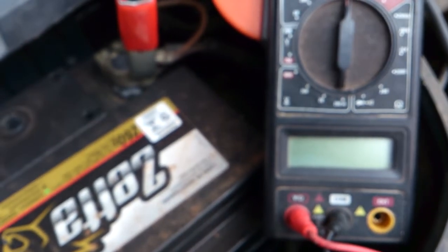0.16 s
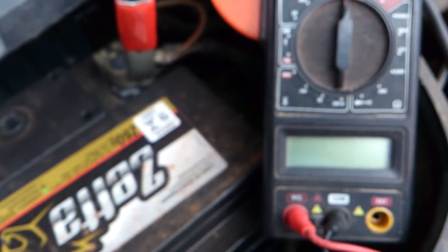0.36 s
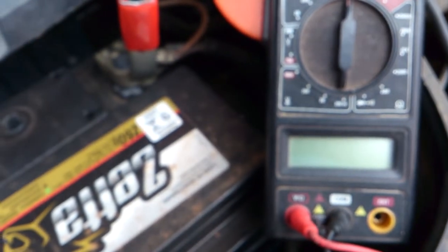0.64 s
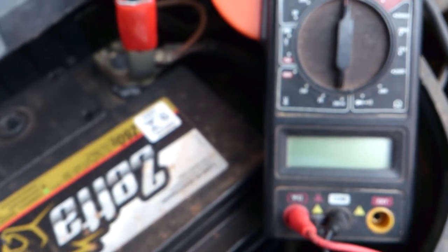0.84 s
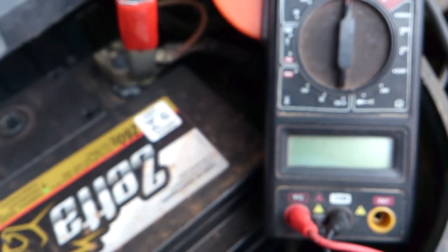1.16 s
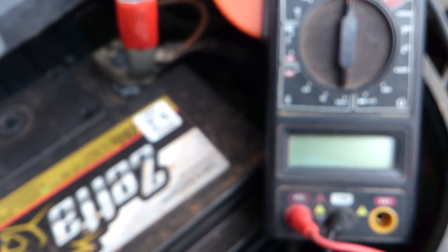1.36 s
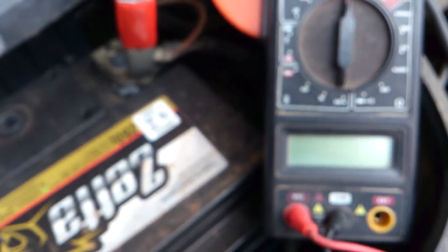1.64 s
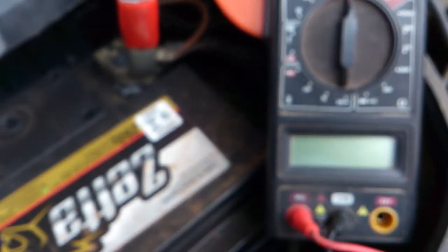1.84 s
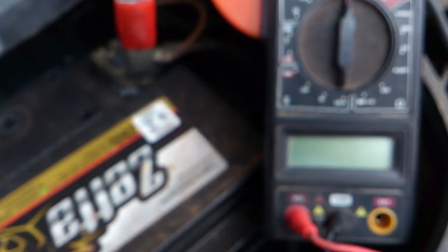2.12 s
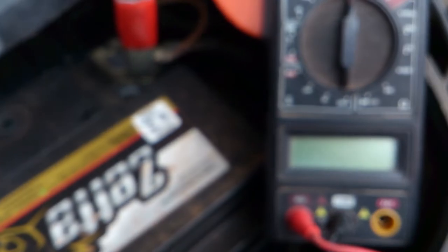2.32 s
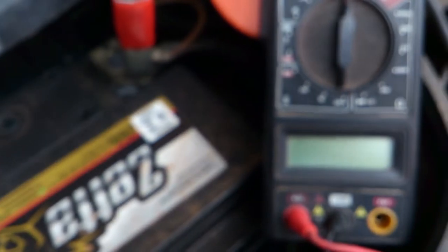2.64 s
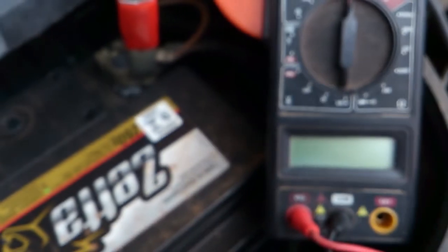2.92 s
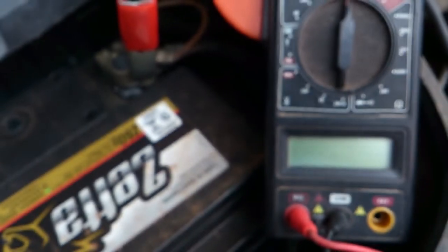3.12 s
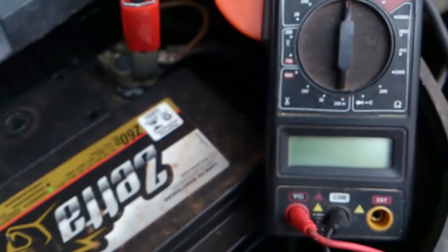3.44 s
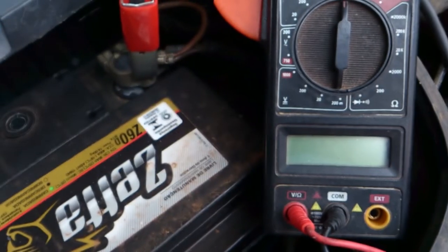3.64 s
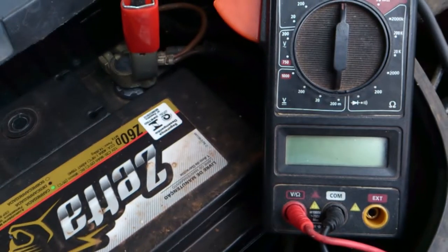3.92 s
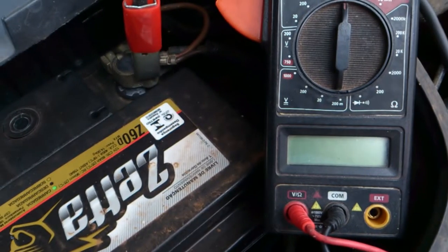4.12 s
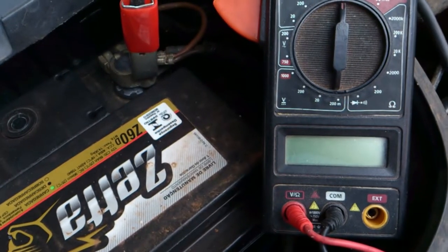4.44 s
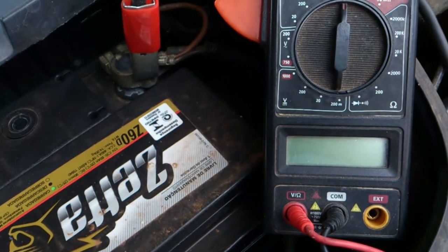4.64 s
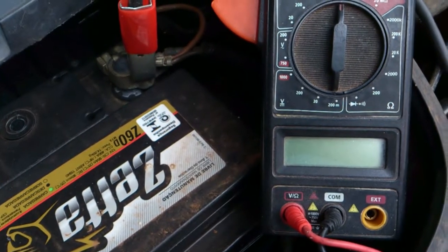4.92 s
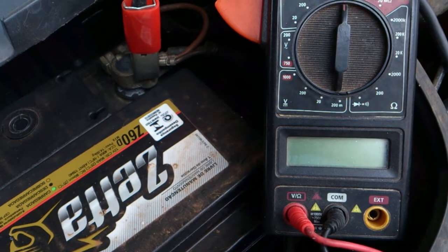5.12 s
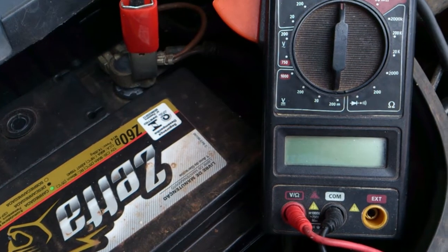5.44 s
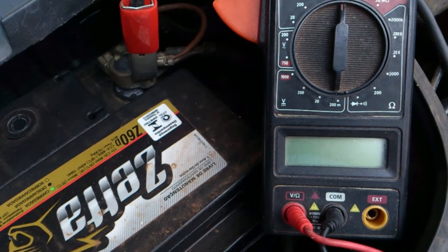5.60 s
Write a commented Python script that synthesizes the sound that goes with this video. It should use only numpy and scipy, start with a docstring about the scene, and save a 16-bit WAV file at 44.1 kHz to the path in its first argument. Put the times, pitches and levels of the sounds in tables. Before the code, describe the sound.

From 0 s a four-cylinder engine idles roughly, heard close under its open bonnet in mono. A hard, bright tappet tick repeats about eight times a second over clattering valves and pistons, airy chuffs and a low exhaust boom with one weak beat. At 0.36 s a sharp spark snaps; around 0.45 s the drone drops out briefly, then steady idling resumes. At 3.1 s it is switched off: ticks slow and soften, the block shudders, and from 3.26 s a dragging belt rasps in surges with hoarse squeals near 1.1 kHz. The crank stops at 3.9 s; dull mount knocks follow around 4.2-4.3 s, with small scrapes and faint ticks. A low distant hum emerges at about 4 s, and a thin squeak at 4.4 s. At 4.7 s a door shuts with a crash and deep thud. Short falling squeaks trail until 5.2 s; quiet hum and air remain.

```python
"""A four-cylinder engine idles under an open bonnet: its exhaust booms with one weak cylinder, its valves and
pistons clatter, and a loud tappet ticks once in each cycle. Early on a stray spark snaps and the engine
misses for a beat. It is switched off and runs down with a rasping, squealing belt, then rocks back and knocks
on its mounts. A distant machine starts to hum and a thin squeak is heard; then a door shuts with a crash and
a thud, more squeaks follow, and the hum remains. Filtered noise, ringing modes and sine waves make it all."""
import sys
import numpy as np
from scipy import signal
from scipy.fft import rfft, irfft
from scipy.io import wavfile
from scipy.ndimage import uniform_filter1d

SR = 44100
rng = np.random.default_rng(int(sys.argv[2]) if len(sys.argv) > 2 else 0)


def digitize_waveform(pressure):
    """Quantize a signal to 16-bit integers and store it at the path in sys.argv[1].

    Rows of a 2-D input are taken as channels; values are limited to [-1, 1].
    """
    field = np.atleast_2d(pressure).T
    bounded = np.clip(field, -1, 1)
    quanta = np.round(bounded * 32767).astype(np.int16)
    wavfile.write(sys.argv[1], SR, quanta)


N = 254438
TIME = np.arange(N) / SR

# puffs of the four cylinders: (share of the cycle after the tick, relative level [dB])
FIRING_PUFFS = [(0.087, 2), (0.338, 3.5), (0.592, 0), (0.842, -10)]
# resonances of the engine block: (frequency [Hz], width [Hz], height above the noise [dB])
BLOCK_PEAKS = [(425, 6.9, 2.5), (541, 11, 5.5), (985, 80, 8), (1054.5, 13.2, 7.5), (1469, 22, 12),
               (1668, 22, 8.5), (1813, 50, 5.5), (2160, 28, 9), (2356, 55, 3), (2600, 40, 6)]
# resonances of the cylinder head: (frequency [Hz], width [Hz], height above the noise [dB])
HEAD_PEAKS = [(4300, 77, 3.3), (5310, 155, 12.2), (6130, 290, 4.7), (6800, 130, 8.8), (9200, 94, 1.3),
              (10980, 200, 2.1), (11770, 200, 3.3)]

IDLE_RPM, FIRST_TICK_S, STOP_S = 990, 0.0859, 3.89
# the ignition fails for a moment, and later it is switched off
MISS_S, MISS_LENGTH_S, SWITCH_OFF_S = 0.44, 0.086, 3.125
# gain of the running engine at idle speed, and its change down to standstill
RUMBLE_DB, RUMBLE_SLOW_DB = -37.5, -12


def from_db(db):
    """Turn decibels into a gain."""
    return 10 ** (np.asarray(db) / 20)


def rms_one(x):
    """Scale a signal to unit power."""
    return x / np.sqrt(np.mean(x ** 2) + 1e-20)


def white():
    """Fresh white noise."""
    return rng.standard_normal(N)


def coloured(noise, colour, peaks=()):
    """Shape noise with a smooth spectrum and resonances on top, then scale it to unit power."""
    hz = np.arange(N // 2 + 1) * SR / N + 0.0011
    points, levels = np.transpose(colour)
    db = np.interp(np.log(hz), np.log(points), levels)
    for centre, width, height in peaks:
        db = db + height / (1 + (2 * (hz - centre) / width) ** 2)
    return rms_one(irfft(rfft(noise) * from_db(db), N))


def clicks(times, db):
    """Single-sample blows at the given times and levels."""
    at = np.round(np.asarray(times) * SR).astype(int)
    inside = (at >= 0) & (at < N)
    gains = from_db(db) * np.ones(len(at))
    return np.bincount(at[inside], gains[inside], N)


def dying(blows, decay_s):
    """Envelope of blows whose energies add up and die away."""
    energy = signal.lfilter([1], [1, -np.exp(-2 / (decay_s * SR))], blows ** 2 + 1e-18)
    return np.sqrt(energy)


def ring(blows, modes):
    """Each blow sets the modes (frequency, level, time to fall 60 dB) ringing, with alternating signs."""
    out = np.zeros(N)
    for k, (hz, db, t60) in enumerate(modes):
        r, w = np.exp(-np.log(1000) / (t60 * SR)), 2 * np.pi * hz / SR
        feedback = [1, -2 * r * np.cos(w), r * r]
        out += (-1) ** k * from_db(db) * signal.lfilter([0, np.sin(w)], feedback, blows + 1e-18)
    return out


def resonate(x, hz, width):
    """A resonance with gain 1 at its peak."""
    r = np.exp(-np.pi * width / SR)
    forward = np.array([1, 0, -1]) * (1 - r * r) / 2
    feedback = [1, -2 * r * np.cos(2 * np.pi * hz / SR), r * r]
    return signal.lfilter(forward, feedback, x + 1e-18)


def flutter(rate, depth_db):
    """A gain that wanders between random values, drawn at this rate per second."""
    return from_db(depth_db * np.interp(TIME * rate, np.arange(N), white()))


def swell(start, length, attack_s, release_s):
    """Rise, hold and fall; the rise comes before start, where the hold begins."""
    rise = np.maximum(start - TIME, 0) / attack_s
    fall = np.maximum(TIME - start - length, 0) / release_s
    return np.exp(-rise - fall)


def speed():
    """Crank speed as a share of idle: it idles, stumbles at the miss and runs down."""
    # (time [s], crank speed [rpm])
    crank_rpm = [(0.0, 979.3), (0.33, 993.1), (0.39, 924.4), (0.46, 985.2), (1.1, 997.2), (1.9, 996.9),
                 (2.45, 979.9), (2.85, 995.9), (3.131, 985.0), (3.33, 719.5), (3.6, 427.4), (3.89, 0.0)]
    return np.interp(TIME, *np.transpose(crank_rpm)) / IDLE_RPM


def by_speed(idle_db, slow_db):
    """A gain that changes by slow_db as the crank slows to a standstill."""
    return from_db(idle_db + slow_db * (1 - speed()))


def cycles():
    """Engine cycles, of two crank turns each, counted from the first tick."""
    turned = np.cumsum(speed()) * IDLE_RPM / 120 / SR  # one cycle a second is 120 rpm
    return turned - np.interp(FIRST_TICK_S, TIME, turned)


def crank_times(shares):
    """When the crank passes these shares of its cycle, one row per cycle; -1 where it never does."""
    turned, turning = cycles(), TIME < STOP_S
    angles = np.arange(-1, turned[-1])[:, None] + np.asarray(shares)
    return np.interp(angles, turned[turning], TIME[turning], left=-1, right=-1)


def tick_times():
    """The tappet strikes at the start of each cycle."""
    s = crank_times([0]).ravel()
    return s[s > 0]


def every_cycle(shares, db, scatter_db, jitter_s):
    """Blows near fixed crank angles, repeated until the crank stops."""
    times = crank_times(shares)
    times = times + jitter_s * rng.standard_normal(times.shape)
    levels = db + scatter_db * rng.standard_normal(times.shape)
    return clicks(times.ravel(), levels.ravel())


def cycle_noise(alike):
    """The same parts meet in each cycle, so a share of the noise power repeats."""
    starts = np.round(np.r_[0, tick_times()] * SR).astype(int)
    since = np.arange(N) - starts[np.searchsorted(starts, np.arange(N), side="right") - 1]
    return np.sqrt(alike) * white()[since] + np.sqrt(1 - alike) * white()


def stroke_swing(lag_share):
    """Swing of the load, from -1 to 1, with the four compression strokes of each cycle."""
    return np.cos(2 * np.pi * (len(FIRING_PUFFS) * cycles() - lag_share))


def tappet(tick_db=-4.5, tick_slow_db=-13, scatter_db=0.45, crack_db=-9, decay_s=0.0035,
           rebound_db=-6, rebound_s=0.0057, ring_db=-1, bay_db=-20, bay_decay_s=0.011):
    """A hard strike and its rebound crack as noise; the cover rings and the engine bay echoes."""
    # ring of the valve cover: (frequency [Hz], level [dB], time to fall 60 dB [s])
    cover_modes = [(3700, -39, 0.088), (4246, -24.5, 0.11), (4670, -42.5, .05), (5185, -8.5, 0.035),
                   (6540, -19.5, 0.03), (7085, -13.5, 0.042), (8400, -30, .035), (8880, -19, 0.0345),
                   (9450, -15.5, 0.06), (10050, -18.5, 0.039), (10320, -20.5, .035), (12000, -24, 0.034),
                   (13600, -33, .04)]
    # colour of the crack: (frequency [Hz], level per hertz [dB])
    tick_colour = [(1000, -41.5), (2800, -15), (3600, -6), (5500, -2.5), (6200, -14.5), (8200, -5.5),
                   (9300, -1), (10500, -2), (12000, -8), (13000, -11), (14000, -27), (16000, -68.5)]
    s = tick_times()
    slowing = 1 - np.interp(s, TIME, speed())
    db = tick_db + tick_slow_db * slowing + scatter_db * rng.standard_normal(len(s))
    strikes = clicks(s, db)
    rebounds = clicks(s + rebound_s, db + rebound_db)
    echo = from_db(bay_db) * dying(strikes, bay_decay_s)
    envelope = np.hypot(dying(strikes + rebounds, decay_s), echo)
    crack = from_db(crack_db) * envelope * coloured(cycle_noise(alike=0.7), tick_colour, HEAD_PEAKS)
    # the blow reaches each mode at a slightly different moment
    delays_s = rng.uniform(0.000619, 0.001864, len(cover_modes))
    ringing = sum(ring(clicks(s + late, db + ring_db), [mode]) for late, mode in zip(delays_s, cover_modes))
    return crack + ringing


def machinery(click_db=1, slow_click_db=-7, click_decay_s=0.0058, valve_lag_share=0.06,
              hiss_idle_db=-35.5, hiss_slow_db=-14, hiss_db=-4, hiss_release_s=0.15,
              clatter_db=-1, clatter_decay_s=0.02, rumble_db=1, rumble_release_s=0.071,
              settled_s=4.4, settling_db=-6):
    """Valves click and pistons clatter, as bursts of noise, over the steady rush of the running engine."""
    # two valves close per cylinder: (share of the cycle after the tick, first level [dB], second level [dB])
    valve_closings = [(.014, 8, 6.5), (0.24, -1, 7.5), (.503, 3.5, 6), (0.718, 2.5, 2)]
    # piston slap: (share of the cycle after the tick, relative level [dB])
    piston_slaps = [(.073, 8.5), (.3, 1), (.44, 1.5), (.646, 5.5), (.72, 6.5)]
    # colours of click, clatter and rumble: (frequency [Hz], level per hertz [dB])
    click_colour = [(1500, -7.5), (3500, -6), (6200, -8.5), (7000, -2), (8200, -1), (9300, 5.5),
                    (11000, -0.5), (12800, -7.5), (13600, -3.5), (14400, -22.5), (16000, -47)]
    clatter_colour = [(200, -32.5), (550, -11), (800, -3), (1300, -8), (2200, -5), (3000, -2), (4200, -4.5),
                      (6000, -9.5), (8000, -4.5), (14000, -43)]
    rumble_colour = [(25, -29), (60, 1), (130, -5.5), (220, -3.5), (350, -2.5), (600, 0), (800, -5),
                     (1050, -5.5), (1350, -7), (1800, -6.5), (3000, -16.5), (6000, -12.5), (14000, -44)]
    # some rumble outlasts the crank, until the block rests on its mounts
    settling = from_db(np.interp(TIME, [STOP_S, settled_s], [0, settling_db]))
    settling = settling * swell(0, settled_s, 1, rumble_release_s)
    rumble_gain = by_speed(RUMBLE_DB, RUMBLE_SLOW_DB) * settling
    hiss_gain = by_speed(hiss_idle_db, hiss_slow_db) * swell(0, STOP_S, 1, hiss_release_s)
    share, first_db, second_db = np.transpose(valve_closings)
    closings = every_cycle(np.r_[share, share + valve_lag_share], np.r_[first_db, second_db],
                           scatter_db=1.0, jitter_s=0.001)
    # a slowing cam sets the valves down more gently
    valves = by_speed(click_db, slow_click_db) * rms_one(dying(closings, click_decay_s))
    slaps = every_cycle(*np.transpose(piston_slaps), scatter_db=2.0, jitter_s=0.00082)
    pistons = rms_one(dying(slaps, clatter_decay_s))
    top = coloured(cycle_noise(alike=0.17), click_colour, HEAD_PEAKS)
    top = np.hypot(valves, from_db(hiss_db)) * top
    middle = coloured(cycle_noise(alike=0.31), clatter_colour, BLOCK_PEAKS + HEAD_PEAKS)
    middle = from_db(clatter_db) * pistons * middle
    low = from_db(rumble_db) * coloured(cycle_noise(alike=0.42), rumble_colour, BLOCK_PEAKS)
    return hiss_gain * top + rumble_gain * (middle + low)


def gasp(gasp_db=-2.2, decay_s=0.017):
    """The engine chuffs in the later half of each cycle: bursts of noise, like gasps of air."""
    # gasps of air: (share of the cycle after the tick, relative level [dB])
    gasp_blows = [(0.532, 0.5), (0.721, 5.5), (.78, 4.5), (0.851, -14.5)]
    # (frequency [Hz], level per hertz [dB])
    gasp_colour = [(900, -6.5), (1600, -5), (2200, 4.5), (2600, -3), (3100, -6), (4500, -5), (8000, -24)]
    blows = every_cycle(*np.transpose(gasp_blows), scatter_db=1.2, jitter_s=0.001)
    envelope = rms_one(dying(blows, decay_s))
    air = coloured(cycle_noise(alike=0.25), gasp_colour, BLOCK_PEAKS)
    return by_speed(RUMBLE_DB + gasp_db, RUMBLE_SLOW_DB) * envelope * air


def drone_level(idle_db=-30.5, miss_db=-17, coast_db=-3.5, knee_share=0.6, stall_db=-26, change_s=0.012):
    """The drone drops out at the miss, softens without ignition and collapses once the crank is slow."""
    missing = swell(MISS_S, MISS_LENGTH_S, change_s, change_s)
    coasting = swell(SWITCH_OFF_S, TIME[-1], change_s, change_s)
    stalling = np.maximum(1 - speed() / knee_share, 0)
    return from_db(idle_db + miss_db * missing + coast_db * coasting + stall_db * stalling)


def exhaust(shake_db=-43.5, shake_delay_s=0.055, shake_length_s=0.27, shake_attack_s=0.035,
            shake_release_s=0.26, stumble_db=-5):
    """Four puffs a cycle, one weak, boom in the pipe; the block shudders at the miss and as it slows."""
    # pipe resonances, each passed twice: (frequency [Hz], width of one pass [Hz], level [dB])
    pipe_modes = [(58.7, 13, -25.5), (102.9, 12, -13), (133.9, 17.2, 0.5), (164.5, 9.9, -11),
                  (233.9, 13, -22.5)]
    share, db = np.transpose(FIRING_PUFFS)
    puffs = every_cycle(share, db, scatter_db=1.4, jitter_s=0.0001)
    boom = np.zeros(N)
    for k, (hz, width, level) in enumerate(pipe_modes):
        sign = (-1) ** (k // 2)  # the modes reach the opening with differing signs
        boom += sign * from_db(level) * resonate(resonate(puffs, hz, width), hz, width)
    boom = rms_one(boom)
    # even out the loudness over about an eighth of a second
    even = boom / np.sqrt(np.abs(uniform_filter1d(boom ** 2, size=5320)) + 0.005)
    shudder = rms_one(resonate(resonate(puffs, 52, 20), 47, 20))
    rocking = swell(SWITCH_OFF_S + shake_delay_s, shake_length_s, shake_attack_s, shake_release_s)
    stumbling = from_db(stumble_db) * swell(MISS_S, MISS_LENGTH_S, shake_attack_s, shake_attack_s)
    return drone_level() * even + from_db(shake_db) * (rocking + stumbling) * shudder


def snaps(room_decay_s=0.053):
    """The spark's crack and a few faint ticks: bursts of noise, each with a short echo."""
    # spark first: (time [s], level [dB], decay [s], echo level relative to the snap [dB])
    snap_blows = [(0.3566, -1.5, 0.0018, -26), (4.051, -41, .006, -22), (4.234, -41.5, 0.004, -20),
                  (5.31, -39.5, 0.0045, -14.5)]
    # (frequency [Hz], level per hertz [dB])
    snap_colour = [(300, -11), (2000, -14), (4400, -1), (5500, -13.5), (7200, 3.5), (8600, 0.5), (10700, 4),
                   (13000, -5.5), (16000, -37)]
    envelope = np.zeros(N)
    for s, db, decay_s, room_db in snap_blows:
        echo = dying(clicks([s], db + room_db), room_decay_s)
        envelope += np.hypot(dying(clicks([s], db), decay_s), echo)
    return envelope * coloured(white(), snap_colour)


def rasp(rasp_db=0.9, release_s=0.029, surge_db=6.0, surge_lag_share=0.051, ring_db=-6, ring_width_hz=35):
    """The dragging belt scrapes, harder at each compression stroke, and sets the pulley ringing."""
    # rubs of the belt as the engine runs down, then as the crank rocks back: (hold start [s], hold length [s],
    # attack [s], relative level [dB])
    belt_rubs = [(3.262, .015, .02, -37.5), (3.36, 0.0058, 0.0033, -37.5), (3.423, 0.46, 0.022, -38.5),
                 (4.101, 0.035, 0.017, -54.5), (4.186, .02, 0.036, -44)]
    # (frequency [Hz], level per hertz [dB])
    belt_colour = [(400, -14), (700, -10), (1000, -7.5), (1300, -2.5), (1650, -13), (2400, -10), (3200, -3),
                   (3800, -10), (4700, -9), (6000, -8.5), (9800, -13.5), (13000, -28), (15000, -43)]
    # pulley and bracket: (frequency [Hz], width in the scrape [Hz], height or ring level [dB])
    pulley_peaks = [(2064, 110, 8.5), (2680, 90, 5), (3136, 150, 5), (3560, 110, 9), (3915, 68, 8.5),
                    (4660, 150, 3), (5940, 170, 5.5), (6600, 150, 5), (7100, 160, 0), (7800, 180, 3),
                    (10100, 400, 5)]
    scrape = coloured(white(), belt_colour, pulley_peaks) * flutter(rate=600, depth_db=1.5)
    ringing = sum(from_db(db) * resonate(white(), hz, ring_width_hz) for hz, _, db in pulley_peaks)
    ringing = coloured(ringing, belt_colour)
    drag = sum(from_db(db) * swell(s, length, attack_s, release_s) for s, length, attack_s, db in belt_rubs)
    surge = from_db(rasp_db + surge_db * speed() * stroke_swing(surge_lag_share))
    return surge * drag * (scrape + from_db(ring_db) * ringing)


def squeal(squeal_db=-2, width_hz=50, swing_hz=45, swing_lag_share=0.88, attack_s=0.011, release_s=0.021):
    """The belt sticks and slips; its pitch swings with the compression strokes."""
    # (hold start [s], hold length [s], middle pitch [Hz], relative level [dB])
    belt_squeals = [(3.278, .014, 1195, -33.5), (3.367, .012, 1090, -34), (3.426, 0.18, 1162, -33),
                    (3.625, 0.095, 1216, -35.5), (3.772, 0.046, 1065, -35.5)]
    swing = swing_hz * stroke_swing(swing_lag_share)
    # uneven slipping widens the squeal into a hoarse band
    blur = [(width_hz, 0), (2 * width_hz, -7), (10 * width_hz, -32), (4000, -80)]
    slip = coloured(white(), blur) + 1j * coloured(white(), blur)
    out = np.zeros(N)
    for s, length, hz, db in belt_squeals:
        phase = 2 * np.pi * np.cumsum(hz + swing) / SR
        tone = np.real(slip * np.exp(1j * phase))
        out += from_db(squeal_db + db) * swell(s, length, attack_s, release_s) * tone
    return out


def mount_knocks():
    """The engine bumps its mounts; a softer contact spreads its push and wakes only the low modes."""
    # (time [s], level [dB], contact time: longer is softer [s])
    mount_bumps = [(3.388, 1.5, 0.00024), (3.94, -12.5, 0.00026), (4.212, 3, 0.00053), (4.23, -3, 0.00045),
                   (4.292, 2, 0.0013)]
    # (frequency [Hz], level [dB], time to fall 60 dB [s])
    mount_modes = [(352, -33, 0.092), (435, -39, 0.17), (470, -38, 0.064), (525, -39.5, 0.2),
                   (587, -35.5, 0.08), (755, -34.5, 0.085), (866, -37.5, 0.16), (954, -37, 0.083),
                   (1240, -34, .05), (1650, -34, 0.049)]
    bumps = np.zeros(N)
    for at, db, contact_s in mount_bumps:
        push = np.exp(-(2 * (TIME - at) / contact_s) ** 2)
        bumps += from_db(db) * push / push.sum()
    return ring(bumps, mount_modes)


def door(crash_decay_s=0.041, room_db=-21, room_decay_s=0.13):
    """The door meets its seal, latches and settles: a crash of noise, and thuds of the ringing panel."""
    # (time [s], crash level [dB], thud level [dB])
    door_blows = [(4.666, -36.5, -44), (4.684, -29.5, -37), (4.696, -26.5, -25.5), (4.714, -28.5, -23.5),
                  (4.758, -48, -23), (4.789, -46, -23), (4.83, -59, -32), (4.905, -54, -38)]
    # (frequency [Hz], level per hertz [dB])
    door_colour = [(18, -49), (30, -25), (92, 1), (167, -3), (195, -21), (253, -5.5), (426, -9), (472, -4),
                   (680, -17), (735, -16), (3410, -24), (4780, -24), (7430, -32.5), (10200, -25),
                   (15000, -63)]
    # (frequency [Hz], level [dB], time to fall 60 dB [s])
    panel_modes = [(49.6, -16, 0.42), (82, -4.5, 0.22), (106, -1.5, 0.14), (146, -12.5, 0.33),
                   (349.3, -15, 0.23), (436, -20, 0.15)]
    s, crash_db, thud_db = np.transpose(door_blows)
    blows = clicks(s, crash_db)
    echo = from_db(room_db) * dying(blows, room_decay_s)
    envelope = np.hypot(dying(blows, crash_decay_s), echo)
    crash = envelope * coloured(white(), door_colour) * flutter(rate=220, depth_db=1.5)
    # the whole panel is pushed one way, so its modes start with the same sign
    thud = sum(ring(clicks(s, thud_db), [mode]) for mode in panel_modes)
    return crash + thud


def squeaks(length_s=0.0065, fall_per_s=2.6, fade_db=-2.4, third_db=-9, top_hz=11500,
            room_db=-5, room_decay_s=0.022):
    """Runs of short falling whistles with overtones, each weaker than the last, blurred by the room."""
    # (time [s], count, gap [s], first pitch [Hz], pitch step [Hz], level [dB], octave relative level [dB])
    squeak_runs = [(4.375, 1, .04, 3550, 0, -51.5, -19), (4.757, 2, .036, 5840, 550, -51, -17),
                   (4.828, 3, 0.029, 5820, -850, -51, -4), (4.915, 3, .04, 5650, -190, -50.5, 0),
                   (5.083, 3, .039, 3550, -20, -50, -10)]
    out = np.zeros(N)
    for s, count, gap, hz, step, db, octave_db in squeak_runs:
        for k in range(round(count)):
            near = np.abs(TIME - s - k * gap) < 0.04
            t = TIME[near] - s - k * gap
            pitch = hz + k * step
            phase = 2 * np.pi * pitch * (t - fall_per_s * t * t / 2)
            octave = from_db(octave_db) * np.sin(2 * phase)
            # leave out a third harmonic that would lie too high
            third = from_db(third_db) * (3 * pitch < top_hz) * np.sin(3 * phase)
            bump = from_db(db + k * fade_db) * np.exp(-(t / length_s) ** 2)
            out[near] += bump * (np.sin(phase) + octave + third)
    out = out * flutter(rate=480, depth_db=5.5)
    room = white() * np.exp(-TIME / room_decay_s)
    return out + from_db(room_db) * signal.fftconvolve(out, room / np.linalg.norm(room))[:N]


def background(attack_s=0.081, release_s=0.057, air_db=-51):
    """A distant machine hums, as four wavering harmonics, in the still air of the workshop."""
    # (time [s], fundamental pitch [Hz])
    hum_pitch = [(4.9, 53.5), (5.25, 55.7), (5.45, 57.36), (5.77, 58.1)]
    # (hold start [s], hold length [s], fundamental [dB], second harmonic [dB], third and fourth [dB])
    hum_spells = [(4.053, .26, -47.5, -50.5, -78), (4.66, 0.65, -46.5, -58.5, -67),
                  (5.334, .45, -44.5, -62, -55)]
    # colour of the air noise: (frequency [Hz], level per hertz [dB])
    air_colour = [(41, -38), (70, 1.5), (198, -8), (311, -17.5), (734, -17.5), (822, -21.5), (984, -16),
                  (1180, -22.5), (2220, -23.5), (2490, -24), (7520, -34), (9860, -28.5), (11600, -38),
                  (15500, -45.5)]
    phase = 2 * np.pi * np.cumsum(np.interp(TIME, *np.transpose(hum_pitch))) / SR
    spells = [np.outer(from_db(db), swell(s, length, attack_s, release_s)) for s, length, *db in hum_spells]
    first, second, upper = np.max(spells, axis=0)
    hum = np.zeros(N)
    for k, gain in enumerate([first, second, upper, upper]):
        hum += gain * np.sin((k + 1) * phase) * flutter(rate=28, depth_db=1.5)
    # the square root of two turns the sines' levels into rms levels
    return np.sqrt(2) * hum + from_db(air_db) * coloured(white(), air_colour)


def scene():
    """The engine, its belt and mounts, the door, the squeaks and the background, added in one channel."""
    engine = tappet() + machinery() + gasp() + exhaust() + snaps()
    stopping = rasp() + squeal() + mount_knocks()
    surroundings = door() + squeaks() + background()
    return (engine + stopping + surroundings)[None]


def record(dry, bass_cut_hz=40, top_cut_hz=15700):
    """The deepest bass is filtered out, the highest peaks are rounded and the top is cut."""
    bass_cut = signal.butter(4, bass_cut_hz, "high", fs=SR, output="sos")
    thin = signal.sosfilt(bass_cut, dry)
    rounded = 0.9 * np.tanh(thin / 0.9)
    top_cut = signal.ellip(10, 0.1, 80, top_cut_hz, fs=SR, output="sos")
    return signal.sosfilt(top_cut, rounded)


dry = scene()
out = record(dry)
digitize_waveform(out)
```